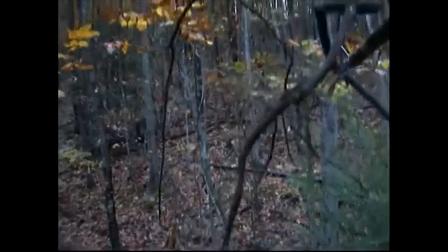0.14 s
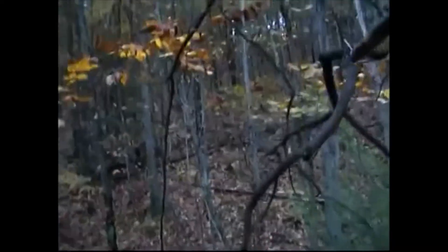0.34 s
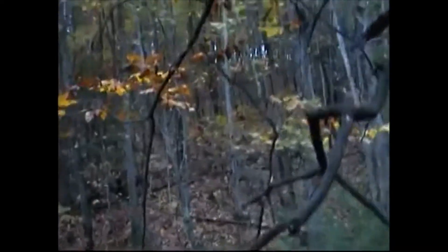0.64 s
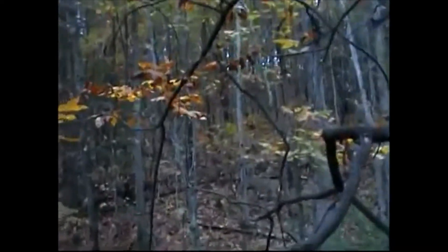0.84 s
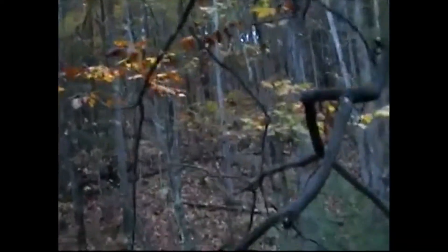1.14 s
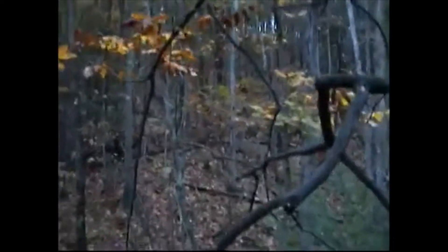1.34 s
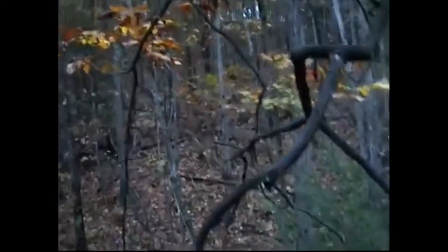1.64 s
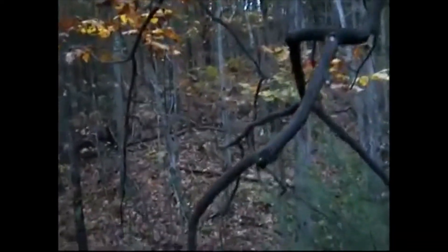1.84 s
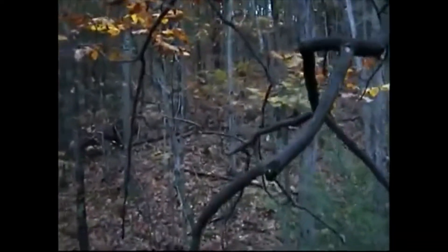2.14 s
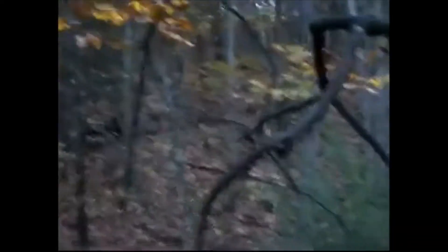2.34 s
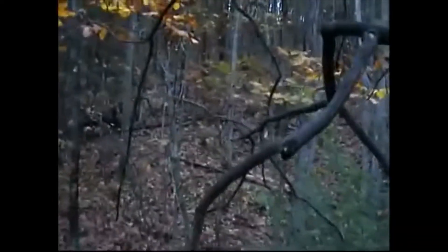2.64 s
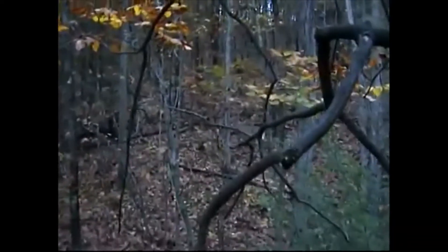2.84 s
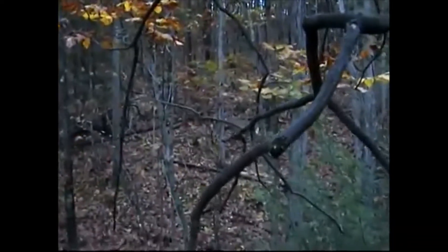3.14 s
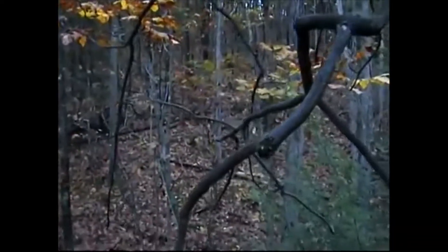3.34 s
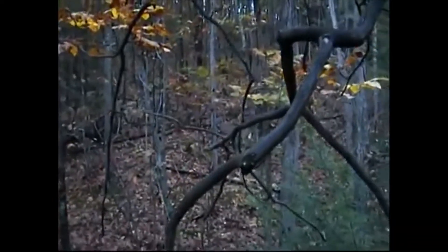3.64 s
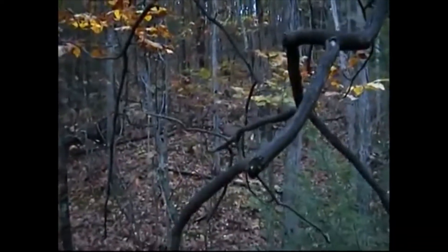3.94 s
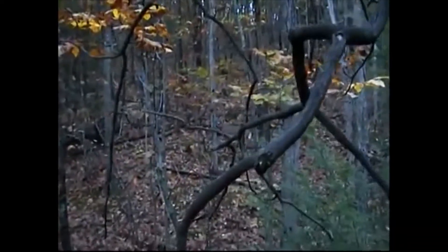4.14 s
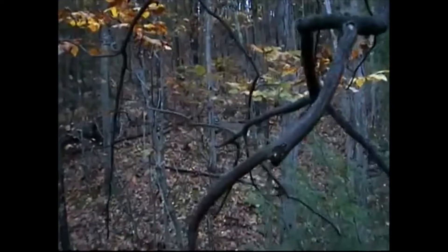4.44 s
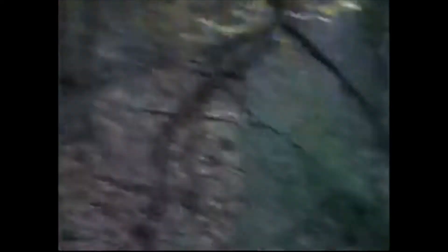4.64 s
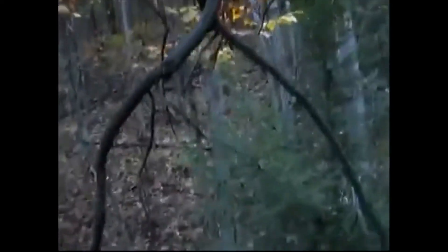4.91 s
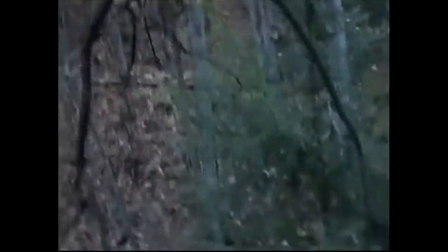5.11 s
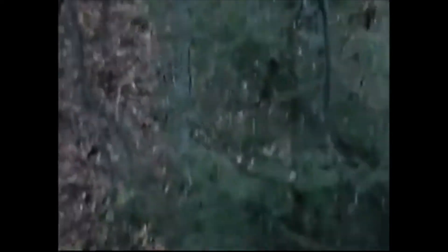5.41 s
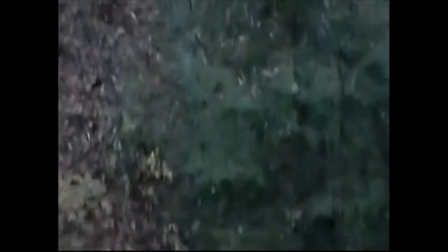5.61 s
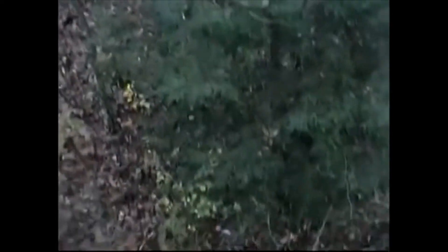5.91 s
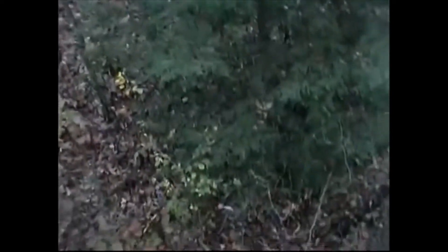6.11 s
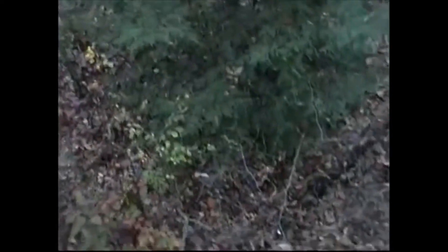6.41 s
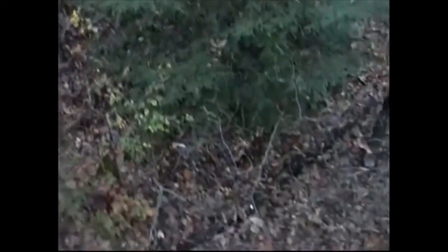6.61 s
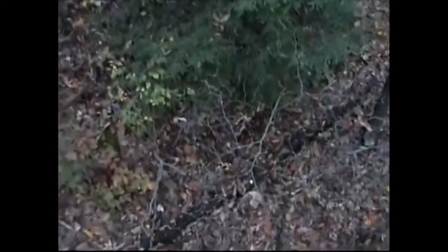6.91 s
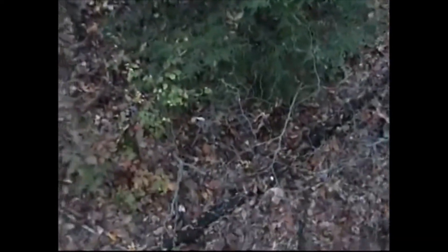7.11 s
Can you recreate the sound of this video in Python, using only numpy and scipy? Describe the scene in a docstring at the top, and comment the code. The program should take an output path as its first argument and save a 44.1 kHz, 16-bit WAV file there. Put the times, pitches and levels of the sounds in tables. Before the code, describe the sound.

Plastic camera knocks and clicks over a faint forest hush, a pause, a hard handling scrape, then dry leaves crunching and rustling softly underfoot.

```python
"""Fingers knock, creep and drag on the plastic shell of a small camera held in an autumn wood.
Short slips set the modes of the shell ringing, and a dense train of slips makes the hard drag.
Dry leaves rustle and crunch in clouds of tiny pitched cracks, with soft thumps of weight;
twigs and stiff leaves snap as brief narrow-band noise. Coloured noise is the hush of the forest,
with a thin hiss over its first seconds."""
import sys
import numpy as np
from scipy import signal
from scipy.fft import rfft, irfft, next_fast_len
from scipy.io import wavfile

SR = 44100
rng = np.random.default_rng(int(sys.argv[2]) if len(sys.argv) > 2 else 0)


def wrap_up_sound(samples):
    """Save the sound to the file named by the first command line argument, as 16-bit audio."""
    columns = np.atleast_2d(samples).T
    # keep every value between -1 and 1, then stretch to whole-number steps
    tamed = np.clip(columns, -1, 1)
    steps = np.round(tamed * 32767).astype(np.int16)
    wavfile.write(sys.argv[1], SR, steps)


N = 320166
BURST = 8192  # samples in a short event
TIME = np.arange(N) / SR
AGE = TIME[:BURST]  # seconds since a short event began


def undb(db):
    """Decibels to gain."""
    return 10 ** (np.asarray(db) / 20)


def unit(x):
    """Scale to rms 1."""
    return x / np.sqrt(np.mean(x ** 2) + 1e-30)


def blow(x, db):
    """Give a burst the energy of 10 ms at this level."""
    return unit(x) * undb(db) * np.sqrt(.01 * SR / x.shape[-1])


def add(out, start_s, x):
    """Mix a burst into the output at its start time."""
    i = int(start_s * SR)
    out[..., i:i + x.shape[-1]] += x[..., :N - i]


def band(x, low_hz, high_hz):
    """Causal band-pass."""
    return signal.sosfilt(signal.butter(3, [low_hz, high_hz], "band", fs=SR, output="sos"), x)


def colour(x, points):
    """Causal minimum-phase filter through (Hz, dB) points, built by folding the cepstrum."""
    size = next_fast_len(x.shape[-1] + BURST)
    size += size % 2
    hz, db = np.transpose(points)
    bins = np.maximum(np.fft.rfftfreq(size, 1 / SR), 1)
    gain = undb(np.interp(np.log(bins), np.log(hz), db))
    cepstrum = irfft(np.log(gain))
    cepstrum[1:size // 2] *= 2
    cepstrum[size // 2 + 1:] = 0
    response = np.exp(rfft(cepstrum))
    return irfft(rfft(x, size) * response)[..., :x.shape[-1]]


def stereo(pair, side):
    """Left and right from two signals, the first as mid and the second, coloured, as side."""
    return pair[0] + np.array([[1], [-1]]) * colour(pair[1], side)


def walk(rate_hz, size=N):
    """Random wander: straight lines between normally distributed knots."""
    knots = rng.standard_normal(1024)
    return np.interp(TIME[:size] * rate_hz, np.arange(len(knots)), knots)


def envelope(start_s, attack_s, end_s, release_s):
    """Rise to 1, hold until the end, die away."""
    rise = np.clip((TIME - start_s) / attack_s, 0, 1)
    return rise * np.exp(-np.maximum(TIME - end_s, 0) / release_s)


def clicks(rate_hz, scatter_db, size):
    """Random clicks, mostly small, a few large; two rows that share moments and sizes."""
    hit = rng.random(size) < rate_hz / SR
    strength = undb(scatter_db * np.minimum(rng.exponential(size=size), 4))
    return hit * strength * rng.standard_normal((2, size))


def resonate(x, hz, width_hz):
    """A single resonance, gain 1 at its centre."""
    return signal.lfilter(*signal.iirpeak(hz, hz / width_hz, fs=SR), x)


def grains(rate_hz, scatter_db, cycles, patchy_db, size):
    """Tiny cracks that each ring at their own pitch; rate and cycles hold at 1 kHz and grow with pitch."""
    out = 0
    for hz in np.geomspace(40, 14500, 56):
        growth = np.sqrt(hz / 1000)
        width_hz = hz / max(cycles * growth, 2)
        cloud = unit(resonate(clicks(rate_hz * growth, scatter_db, size), hz, width_hz))
        # some pitches crowd in for a moment
        out = out + cloud * np.sqrt(hz) * undb(patchy_db * walk(45, size))
    return out


def ring(modes, detune=0., scatter_db=0.):
    """Decaying sines at the two ports; each touch can detune the modes and weight them anew."""
    hz, t60_s, db, pan_db, phase = np.transpose(modes)[:, :, None]
    chance = rng.standard_normal((2, len(modes), 1))
    t = AGE[:BURST // 2]
    fade = undb(db + scatter_db * chance[0]) * np.exp(-np.log(1000) * t / t60_s)
    turn = 2 * np.pi * hz * (1 + detune * chance[1]) * t
    ports = [fade * undb(side * pan_db) * np.sin(turn + side * phase) for side in (.5, -.5)]
    return np.array([port.sum(0) for port in ports])


# Finger knocks on the shell. Each row: start in seconds, slip length in seconds before stretching,
# level in dB, brightness in dB before each part takes its share (plus favours ring over body).
KNOCKS = [(0.701, 0.0029, -37, -1.5), (1.011, .0026, -42.5, 0), (1.025, 0.0036, -46, 3),
          (1.08, 0.0027, -33.5, 2), (1.089, 0.0062, -34, 0.5), (1.113, 0.0092, -30, -2),
          (1.196, 0.0036, -41, -4), (1.219, 0.0015, -34.5, -1), (1.268, 0.003, -19.5, 12),
          (1.306, 0.0016, -33.5, -1), (1.372, 0.0052, -31, -1), (1.551, .0026, -34.5, -5.5),
          (1.563, .003, -35.5, 1), (1.6, 0.0025, -35.5, -1), (1.637, 0.0055, -43, -6),
          (1.665, 0.0053, -26, -5), (1.707, 0.0049, -30.5, 0.5), (1.741, 0.0032, -24.5, 15.5),
          (1.764, 0.013, -33, -20), (1.798, 0.0014, -35, 1), (1.861, 0.0037, -31, -5),
          (1.878, .008, -30, -6.5), (1.898, 0.0049, -36.5, 4), (1.926, 0.0027, -33.5, 4),
          (2.014, 0.0044, -46.5, -9), (2.051, 0.0045, -45.5, -8), (2.122, .0065, -46.5, -9),
          (2.182, .009, -34.5, -5), (2.201, 0.0087, -23, 1.5), (2.211, 0.0016, -13.5, -0.5),
          (2.228, 0.011, -22, -1.5), (2.245, 0.0054, -16.5, 5.5), (2.26, 0.0021, -29, 2),
          (2.281, 0.0023, -36, 1), (2.305, 0.003, -29.5, 1), (2.315, 0.0042, -33, -1.5),
          (2.373, 0.0077, -17.5, -3.5), (2.38, 0.0064, -16.5, -1.5), (2.395, .0042, -24.5, -1),
          (2.425, .004, -18.5, 2), (2.478, 0.011, -47, -21), (4.668, 0.0033, -28, -8),
          (4.69, 0.0059, -20.5, 1.5), (4.737, 0.0019, -26.5, 0.5), (4.778, .0018, -19, -2.5)]
# Parts of the shell's voice: thud, body, ring and tick. Each row: low edge in Hz, high edge in Hz.
SHELL_PARTS = [(60, 300), (300, 750), (750, 2300), (2300, 13000)]
# Balance of those parts. Each row: dB against the knock before its brightness acts,
# share of the brightness (a ratio).
KNOCK_SHARES = [(-18, -0.42), (-3, -0.46), (-3, 0.65), (-19.5, 0.045)]
# Modes of the plastic shell. Each row: centre pitch in Hz, time to fall 60 dB in seconds,
# relative strength in dB, left minus right in dB, phase between the two ports in radians.
SHELL = [(158, 0.017, -37, -17, .1), (250, 0.056, -7.5, -11, 0.16), (443, 0.042, -25, -21, .4),
         (508.6, 0.041, 3.5, -2, 0.13), (635, 0.0097, 13, 2, 0.24), (875, 0.016, 1, -3, 0.33),
         (1043, 0.013, 9, 6.5, 0.52), (1530, 0.015, 8, 0.5, 1.5), (2030, 0.011, -1, -3.5, 1.1),
         (2750, 0.0067, 2, -5, 1.67), (3090, 0.03, -11, -2, 0.88), (3620, 0.0083, -9.5, -23, 0.94),
         (4420, 0.01, -6, -6, 0.43), (5130, 0.0078, -8, -10, 0.5), (6970, 0.00091, 2.5, -22.5, 0.48),
         (9500, .002, -25, 3, 1.2)]


def knocks(slip_rate=1800, slip_db=-8, creep_db=-26, creep_s=0.023, soft_hz=3600, soft_db=-54, octave_db=17):
    """A finger lets go with a snap, stutters for some milliseconds and creeps to rest; the shell rings."""
    out = np.zeros((2, N))
    share_db, tilt = np.transpose(KNOCK_SHARES)
    for start_s, length_s, db, bright_db in KNOCKS:
        # brightness moves energy between the parts and leaves the sum alone
        shares = undb(share_db + tilt * bright_db)
        shares = shares * np.linalg.norm(undb(share_db)) / np.linalg.norm(shares)
        part_db = db + 20 * np.log10(shares)
        stutter = undb(slip_db) * np.exp(-(AGE / (1.71 * length_s)) ** 2)
        rest = undb(creep_db) * np.exp(-AGE / creep_s)
        slips = clicks(slip_rate, 3.2, size=BURST)[0] * (stutter + rest)
        slips[0] += .9  # the first snap
        # a harder contact is shorter, so it reaches higher
        reach_hz = np.clip(soft_hz * 2 ** ((part_db[-1] - soft_db) / octave_db), 2500, 10000)
        push = band(slips, 24, reach_hz)[None]
        shell = signal.fftconvolve(push, ring(SHELL, detune=0.054, scatter_db=1.5))[:, :BURST]
        parts = [blow(band(shell, *edges), level) for edges, level in zip(SHELL_PARTS, part_db)]
        add(out, start_s + .0008, sum(parts))  # sounds 0.8 ms after its start
    return out


# the skin creeps just before each knock and for longer after it, more around the strong ones
CREEP_DB, CREEP_PER_KNOCK_DB = -44.5, 0.15  # level beside a 0 dB knock, dB per dB of knock
CREEP_LEAD_S, CREEP_FADE_S = 0.034, 0.054


def creep(slip_rate=600, reach_hz=5000):
    """Around each knock the skin slides in tiny steps that tick softly through the shell."""
    pressure = np.zeros(N)
    for start_s, _, db, _ in KNOCKS:
        near = np.exp(-np.maximum((start_s - TIME) / CREEP_LEAD_S, (TIME - start_s) / CREEP_FADE_S))
        pressure = np.maximum(pressure, undb(CREEP_DB + CREEP_PER_KNOCK_DB * db) * near)
    slips = band(clicks(slip_rate, 3.6, size=N)[0], 44, reach_hz)
    return unit(signal.fftconvolve(slips[None], ring(SHELL))[:, :N]) * pressure


# The hand drags over the shell in a few pushes. Each row: start in seconds, length in seconds
# before the release, force level in dB.
PUSHES = [(4.47, 0.048, -17), (4.51, 0.05, -16.5), (4.568, 0.022, -18.5), (4.596, 0.037, -18)]
PUSH_ATTACK_S, LET_GO_S, LINGER_S = 0.013, 0.015, 0.062
LINGER = 0.2  # share of the force that lingers


def drag_force():
    """Each push bites, holds and lets go, except for a light lingering touch."""
    force = np.zeros(N)
    for start_s, length_s, db in PUSHES:
        firm = envelope(start_s, PUSH_ATTACK_S, start_s + length_s, LET_GO_S)
        light = envelope(start_s, PUSH_ATTACK_S, start_s + length_s, LINGER_S)
        force = np.maximum(force, undb(db) * ((1 - LINGER) * firm + LINGER * light))
    return force


# Tone of the rubbing. Each row: pitch in Hz, relative level in dB.
DRAG_COLOUR = [(24, -45), (40, -19), (124, -20), (158, -2.5), (197, -8), (401, -8), (487, -23), (565, -4),
               (1470, -10), (1700, -12.5), (2170, -16), (11800, -41.5), (14000, -46)]
# Width of the rubbing. Each row: pitch in Hz, side minus mid in dB.
DRAG_SIDE = [(60, 11), (110, -15), (200, -16), (370, -9), (690, -10), (1260, -7), (2330, -1), (4280, -6.5),
             (7870, -3), (14500, 2)]
# Resonances of the gripped shell. Each row: pitch in Hz, time to fall 60 dB in seconds,
# relative strength in dB, left minus right in dB, phase between the ports in radians.
GRIP = [(174, 0.06, -6.5, -6, .1), (507, 0.024, 5, 6.5, .2), (538, 0.05, 2, -9, 0.16),
        (915, 0.08, 0, 5, 0.74), (1448, 0.037, 1.5, -6, .6)]
# the scrape at the ports builds more slowly and dies down as the hand moves on
SCRAPE_DB, SCRAPE_ATTACK_S, SCRAPE_SAG_DB_PER_S = -4.5, 0.023, 49


def drag(slip_rate=2200, grip_db=-2, click_db=-7):
    """Skin sticks and slips over the shell in a dense train that shakes it and scrapes at the ports."""
    first, size = int(PUSHES[0][0] * SR), 2 * BURST
    span, age = slice(first, first + size), TIME[:size]
    shudder = drag_force()[span]
    scrape = shudder * np.minimum(age / SCRAPE_ATTACK_S, 1) * undb(SCRAPE_DB - SCRAPE_SAG_DB_PER_S * age)
    slips = unit(clicks(slip_rate, 1.6, size=size))
    ridges = unit(grains(200, 3.1, 6, 3.8, size=size))
    rub = colour(stereo(ridges + undb(click_db) * slips, DRAG_SIDE), DRAG_COLOUR)
    held = signal.fftconvolve(slips[:1], ring(GRIP))[:, :size]
    low = unit(band(unit(rub) + undb(grip_db) * unit(held), 77, 3170))
    high = unit(band(rub, 2670, 12600))
    out = np.zeros((2, N))
    out[:, span] = low * shudder + high * scrape
    return out


# How strongly the leaves stir underfoot. Each row: time in seconds, level in dB before
# the opening rise and the trims of rustle, crackle and litter.
STIR = [(4.8, -43.5), (5.12, -43.5), (5.43, -51.5), (5.73, -56), (5.99, -50), (6.35, -44.5), (6.59, -51.5),
        (7.04, -54), (7.25, -49)]
STIR_START_S, STIR_RISE_S, STIR_FLICKER_DB = 4.48, 0.28, 0.1


def leaf_stir():
    """The stirring rises from silence, follows its level curve and flickers slightly."""
    stir = undb(np.interp(TIME, *np.transpose(STIR)) + STIR_FLICKER_DB * walk(22))
    return stir * np.clip((TIME - STIR_START_S) / STIR_RISE_S, 0, 1)


# Crunches. Each row: start in seconds, length in seconds before stretching, level in dB before
# the trims below, weight in dB (heavy ones thump more and crackle less).
CRUNCHES = [(4.756, .008, -25.5, -1), (4.828, 0.014, -37, -2), (4.851, .0078, -42.5, 0),
            (4.88, 0.0053, -44, 8.5), (4.915, 0.016, -39.5, 4), (4.981, 0.01, -47, 4),
            (5.05, 0.017, -38, -5.5), (5.093, 0.0088, -41.5, -4), (5.141, 0.031, -40, -7),
            (5.163, 0.043, -36.5, -4.5), (5.244, .01, -38.5, -3), (5.286, 0.013, -40.5, -7),
            (5.406, .025, -50, 1), (5.433, 0.019, -44, -2.5), (5.51, 0.012, -43, 7),
            (5.654, .0047, -39.5, 4.5), (5.739, 0.028, -43.5, -8), (5.813, 0.01, -42, 6),
            (5.87, 0.013, -44.5, -4), (5.889, 0.022, -35, -1), (5.92, 0.042, -43.5, 1),
            (6.022, 0.013, -43.5, 5.5), (6.107, 0.032, -37, -5), (6.15, .014, -36.5, 14.5),
            (6.201, 0.016, -33.5, 8), (6.239, 0.02, -39, 0), (6.431, 0.021, -45.5, -10.5),
            (6.508, 0.015, -44, -7), (6.546, .019, -49, -10), (6.699, .01, -54.5, 12),
            (6.758, 0.014, -44.5, -2), (6.796, 0.011, -41, -2), (6.844, .0072, -49.5, -1),
            (7.054, 0.031, -41, -9.5), (7.184, 0.019, -45.5, -3)]
# Tone of the cracking leaves. Each row: pitch in Hz, relative level in dB.
LEAF_COLOUR = [(120, -41), (200, -19), (312, -16), (373, -9), (415, -8), (815, -9), (1410, -7.5),
               (3380, -13.5), (3820, -13.5), (4250, -14), (11300, -22.5), (12800, -38), (14000, -92)]
# Width of the leaves. Each row: pitch in Hz, side minus mid in dB.
LEAF_SIDE = [(60, -10), (110, -9), (200, -11), (370, -23), (690, -21.5), (1260, -23), (2330, -17.5),
             (4280, -10), (7870, -7), (14500, 4.5)]
# Tone of the thumps of weight. Each row: pitch in Hz, relative level in dB.
THUMP_COLOUR = [(40, -26), (90, -9), (215, -14.5), (270, -3), (310, -3.5), (370, -5.5), (450, -4.5),
                (700, -11.5), (1500, -38)]
# Tone of the dull litter. Each row: pitch in Hz, relative level in dB.
LITTER_COLOUR = [(30, 1.5), (85, 3), (180, -5), (300, -3.5), (520, -16.5), (800, -32), (1500, -35)]
LEAF_SPLIT_HZ = 2500  # rustle below, crackle above
STIR_RUSTLE_DB, STIR_CRACKLE_DB, STIR_LITTER_DB = -5.5, -4.5, -9.5  # against the stir
CRUNCH_RUSTLE_DB, CRUNCH_THUMP_DB, CRUNCH_CRACKLE_DB = -1.13, -5.5, -4  # against a crunch's level
CRACKLE_LOSS = 0.84  # dB of crackle lost per dB of weight
CRACKLE_LINGER, CRACKLE_LINGER_S = 0.2, 0.1  # the fine crackle outlasts each press


def leaves(settle=0.19, settle_s=0.058, thump_lag_s=0.0024):
    """Countless tiny cracks in dry leaves; each press sets off a settling flurry, then weight thumps."""
    stir = leaf_stir()
    # rustle and crackle add up as power
    rustle = (stir * undb(STIR_RUSTLE_DB)) ** 2
    crackle = (stir * undb(STIR_CRACKLE_DB)) ** 2
    thumps = np.zeros((2, N))
    for start_s, length_s, db, weight_db in CRUNCHES:
        # a press bites at once, fades and settles
        press = np.exp(-(AGE / (1.38 * length_s)) ** 2) + settle * np.exp(-AGE / settle_s)
        press = press * (1 - np.exp(-AGE / 0.00079))
        add(rustle, start_s, blow(press, db + CRUNCH_RUSTLE_DB) ** 2)
        unfolding = press + CRACKLE_LINGER * np.exp(-AGE / CRACKLE_LINGER_S)
        crackle_db = db + CRUNCH_CRACKLE_DB - CRACKLE_LOSS * weight_db
        add(crackle, start_s, blow(unfolding, crackle_db) ** 2)
        weight = stereo(rng.standard_normal((2, BURST)) * press, [(100, -19), (600, -21)])
        thump = blow(colour(weight, THUMP_COLOUR), db + CRUNCH_THUMP_DB + weight_db)
        add(thumps, start_s + thump_lag_s, thump)
    cracks = grains(600, 2.4, 6, 2.5, size=N)
    cracks = colour(stereo(cracks, LEAF_SIDE), LEAF_COLOUR)
    blades = unit(band(cracks, 440, LEAF_SPLIT_HZ)) * np.sqrt(rustle)
    edges = unit(band(cracks, LEAF_SPLIT_HZ, 17000)) * np.sqrt(crackle)
    # the litter shifts dully as long as the leaves stir
    shifting = stereo(rng.standard_normal((2, N)), [(100, -17), (600, -30)])
    shifting = unit(colour(shifting, LITTER_COLOUR))
    litter = shifting * stir * undb(STIR_LITTER_DB + 0.57 * walk(9.9))
    return blades + edges + thumps + litter


# Twigs and stiff leaves snapping. Each row: start in seconds, pitch in Hz,
# nominal width in Hz (it sets the fade, and the filters are wider), level in dB.
SNAPS = [(.707, 670, 89, -37.5), (0.929, 4970, 3000, -59), (.95, 5000, 2500, -57), (0.993, 4200, 2500, -56),
         (1.053, 4480, 1730, -38), (1.22, 2660, 880, -42.5), (1.2698, 1480, 330, -28),
         (1.348, 2980, 1200, -52.5), (1.39, 1630, 266, -35.5), (2.564, 1690, 507, -56),
         (5.743, 4000, 120, -56), (5.893, 870, 500, -33.5), (6.118, 1860, 120, -44),
         (6.151, 3800, 258, -35), (6.153, 3020, 700, -39.5), (6.211, 3700, 260, -41)]
SNAP_FADE_S, SNAP_BUZZ = 0.0017, 0.59  # a snap lasts longer by SNAP_BUZZ / width


def snaps():
    """A stem or a stiff leaf gives way and buzzes briefly at its own pitch; the purer, the longer."""
    out = np.zeros((2, N))
    for start_s, hz, width_hz, db in SNAPS:
        fade = np.exp(-AGE / (SNAP_FADE_S + SNAP_BUZZ / width_hz))
        split = stereo(rng.standard_normal((2, BURST)), [(1000, -10), (6000, -9)]) * fade
        buzz = resonate(resonate(split, hz, 1.54 * width_hz), hz, 1.54 * width_hz)
        add(out, start_s, blow(buzz, db))
    return out


# Tone of the forest air. Each row: pitch in Hz, relative level in dB.
FOREST = [(15, -39), (25, 1), (42, -15), (80, 0.5), (208, -0.5), (318, -3), (616, -4.5), (666, -5.5),
          (741, -3), (1330, -14.5), (1870, -17), (2380, -21.5), (11300, -33), (12600, -40.5), (14000, -42)]
# Width of the forest air. Each row: pitch in Hz, side minus mid in dB.
FOREST_SIDE = [(60, -3.5), (110, -4), (200, -4), (370, -1.5), (690, -7), (1260, -2.5), (2330, -1),
               (4280, -2.5), (7870, -1.5), (14500, 6.5)]
# Tone of the thin hiss. Each row: pitch in Hz, relative level in dB.
HISS_COLOUR = [(1500, -16), (3300, -4.5), (4500, -15), (7500, -10), (9800, -19), (10900, -6), (12300, -11),
               (13200, -46)]
FOREST_DB, FOREST_PAN_DB = -55.5, -1.5  # level before the early lift and the wander, left minus right
# a thin high hiss swells, holds and fades
HISS_DB, HISS_RISE_S, HISS_END_S, HISS_FADE_S = -61, 0.52, 1.52, 0.2


def forest():
    """Distant air in the trees, a little louder in the first seconds, when a thin hiss joins it."""
    air = unit(colour(stereo(rng.standard_normal((2, N)), FOREST_SIDE), FOREST))
    air = air * undb(FOREST_PAN_DB * np.array([[.5], [-.5]]))
    early_db = np.interp(TIME, [0, .9, 2.3, 2.7], [0.66, 2.54, 3.7, 0.62])
    air = air * undb(FOREST_DB + early_db + .5 * walk(8.0))
    hiss = unit(colour(rng.standard_normal((2, N)), HISS_COLOUR))
    swell = envelope(0, HISS_RISE_S, HISS_END_S, HISS_FADE_S)
    return air + hiss * swell * undb(HISS_DB + walk(25.7))


def scene():
    """Handling noise, leaves, snapping stems and forest together."""
    return knocks() + creep() + drag() + leaves() + snaps() + forest()


TOP_HZ = 13200


def record(dry):
    """The camera rounds the loudest peaks and cuts the top."""
    rounded = np.tanh(1.1 * dry) / 1.1
    return signal.sosfilt(signal.ellip(8, .2, 70, TOP_HZ, fs=SR, output="sos"), rounded)


dry = scene()
out = record(dry)
wrap_up_sound(out)
```